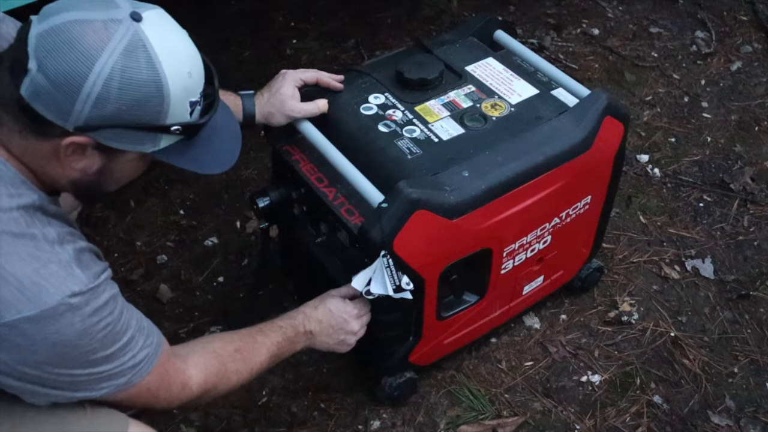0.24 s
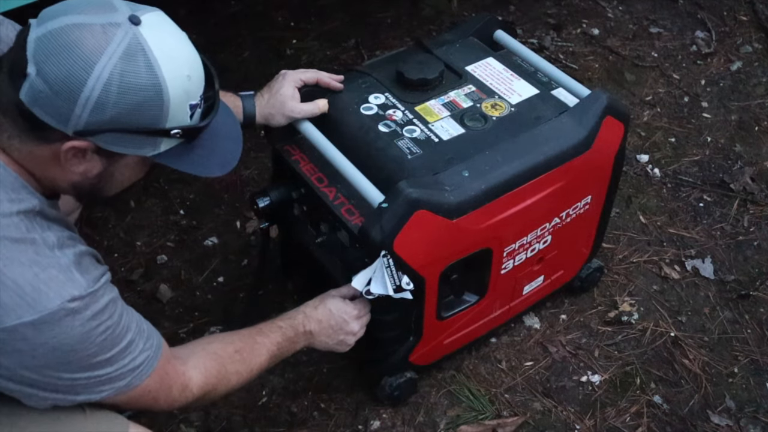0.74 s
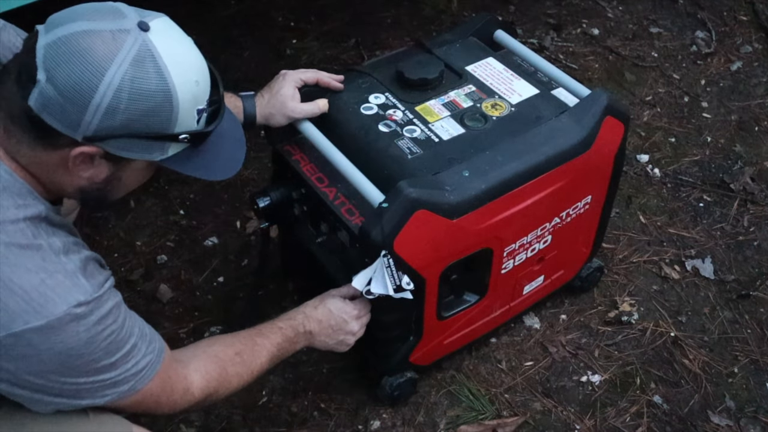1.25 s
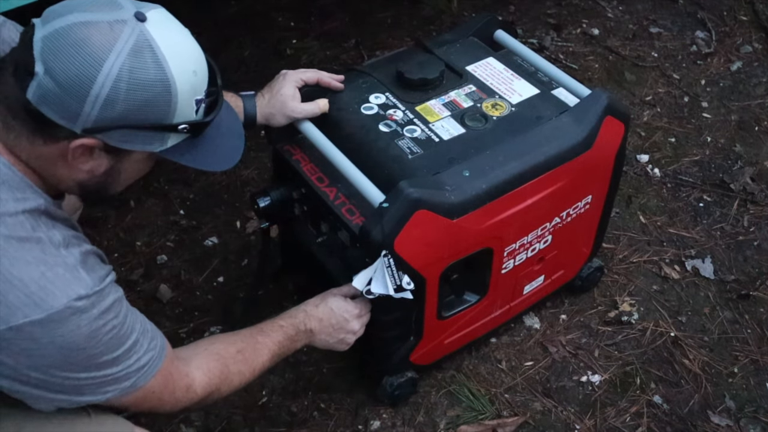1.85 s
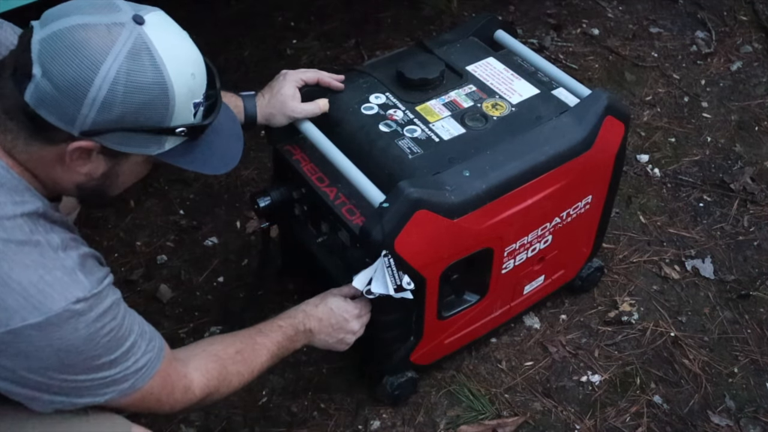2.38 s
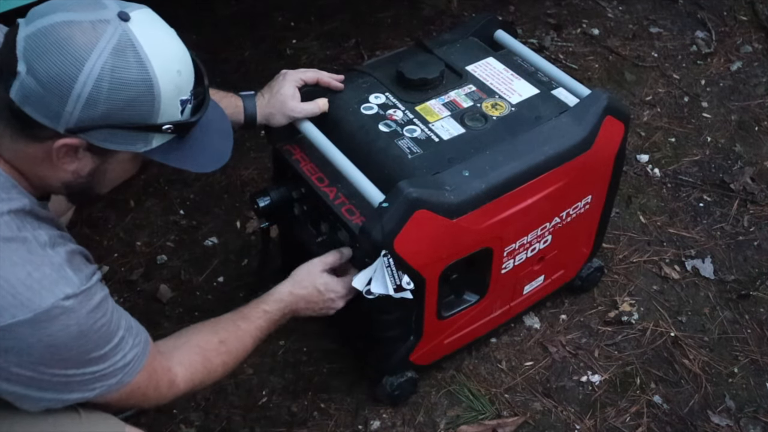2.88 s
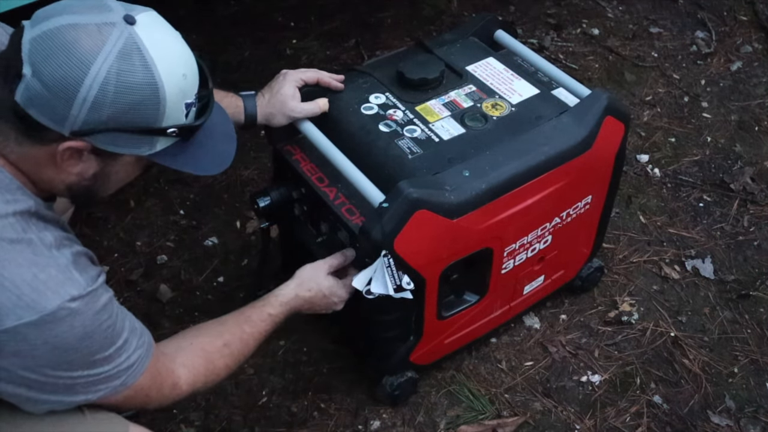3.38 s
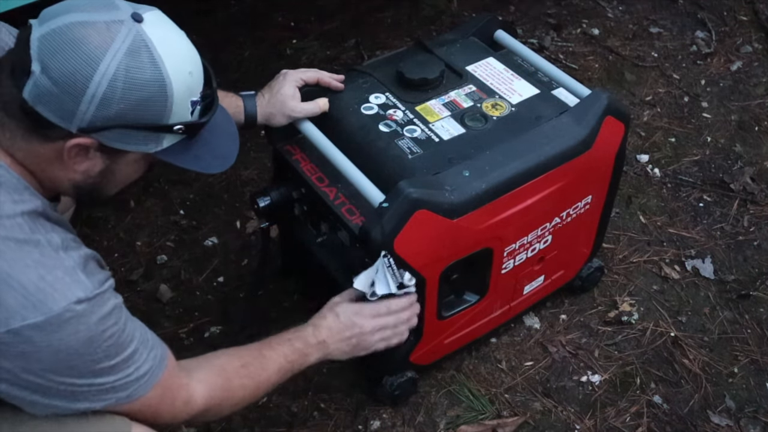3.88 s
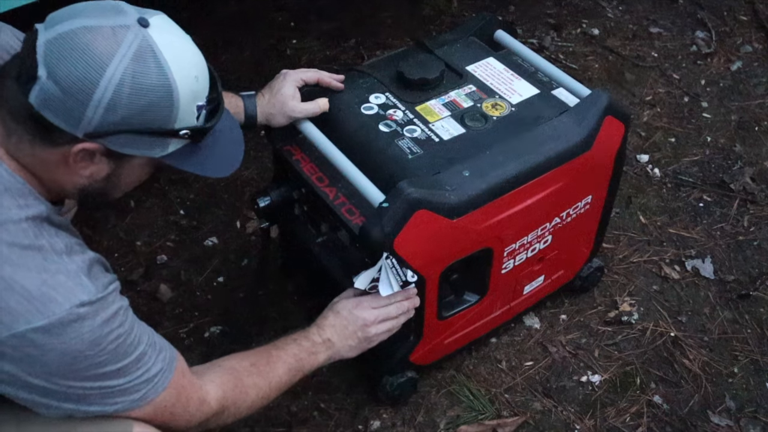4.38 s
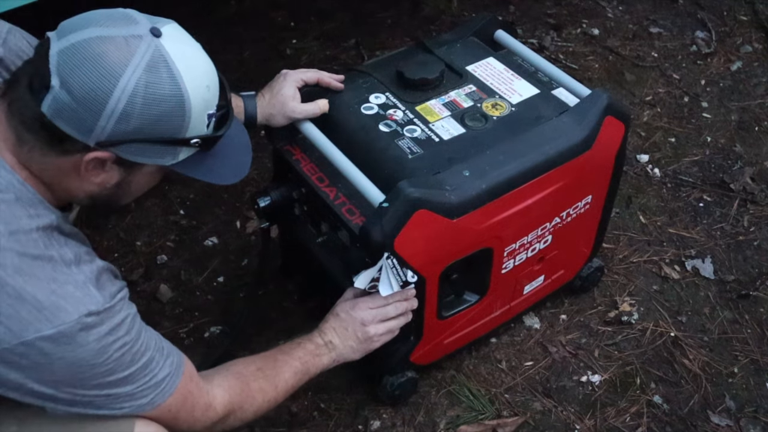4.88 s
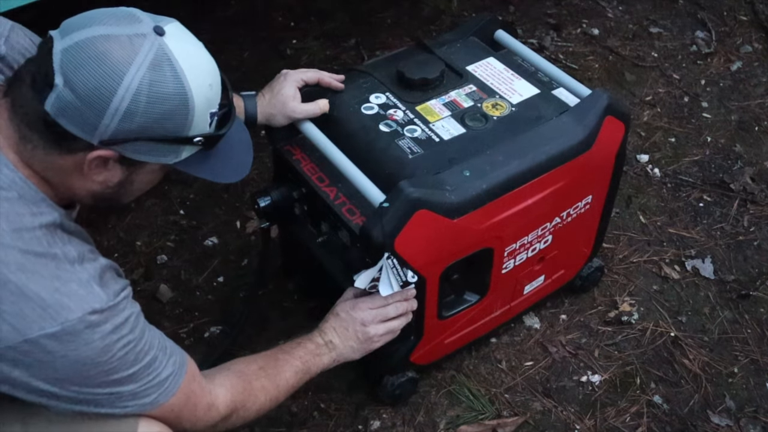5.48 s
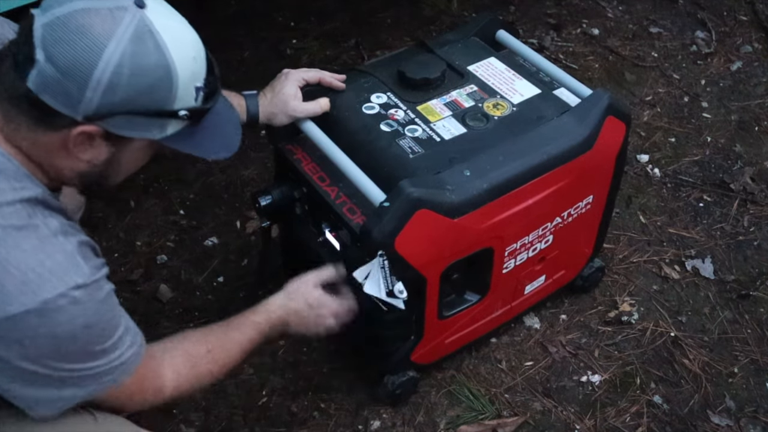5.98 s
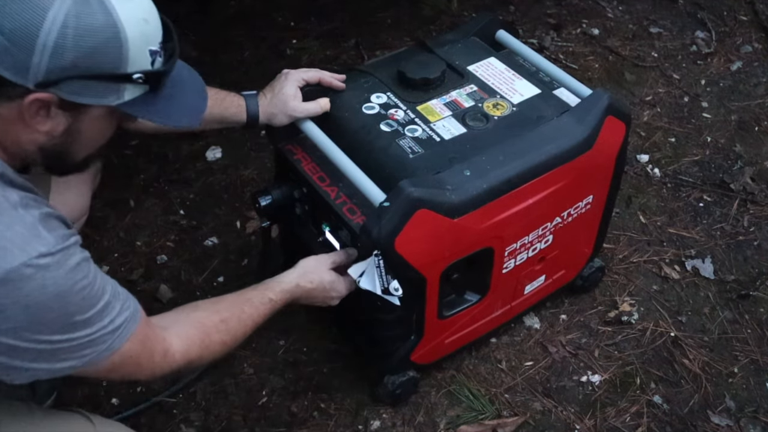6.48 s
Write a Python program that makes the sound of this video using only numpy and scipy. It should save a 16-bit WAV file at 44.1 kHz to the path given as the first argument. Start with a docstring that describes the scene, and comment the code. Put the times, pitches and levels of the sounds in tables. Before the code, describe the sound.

A small petrol generator's electric starter cranks without firing, coasts to a stop, clicks, then cranks again, catches with hard knocks and revs up.

```python
"""Forest floor, a portable petrol generator; one microphone channel, no distance or reflections modelled.
First the electric starter cranks the single-cylinder four-stroke in still air while the carburettor's servo hums.
The key is let go and all coasts to rest; a control is clicked over as the hum weakens.
On the second try the starter clanks in, the engine catches, knocks hard for a few cycles and runs up.
Crank angle times gear tones, gas puffs and contacts; noise bursts and ringing sines make the blows and knocks."""
import sys
import numpy as np
from scipy import signal
from scipy.fft import rfft, irfft, next_fast_len
from scipy.io import wavfile

SR = 44100
rng = np.random.default_rng(int(sys.argv[2]) if len(sys.argv) > 2 else 0)


def wav_out(sig):
    """Save sig, one row per channel (or a flat mono array), as 16-bit PCM at SR to the path in sys.argv[1]."""
    wavfile.write(sys.argv[1], SR, np.round(np.clip(np.atleast_2d(sig).T, -1, 1) * 32767).astype(np.int16))


N = 297234
TIME = np.arange(N) / SR

# still forest air, spectrum: [f/Hz, relative level/dB]
AIR_SPECTRUM = [(15, -51), (25, -16.5), (76, -5), (111, 0), (145, 0.5), (200, 7), (242, -6.5), (427, -11.5),
                (503, -8.5), (677, -9.5), (863, -8), (2160, -26.5), (2840, -16), (3340, -26),
                (16000, -31.5)]
# servo hum over time: [t/s, level/dB]
HUM_LEVEL = [(0, -24.5), (3.2, -33.5), (3.8, -35.5), (4.1, -45), (4.6, -42.5), (6.74, -55)]
# lines of the servo hum: [f/Hz, relative level/dB]
HUM_LINES = [(105, -9.5), (210.5, -4.5), (272, -28), (552, -23.5), (829, -20.5)]
# starter gears, spectrum: [f/Hz, relative level/dB]
GEAR_SPECTRUM = [(40, -2.5), (100, 3.5), (200, -4), (300, -8), (450, -5.5), (570, -15), (800, -9),
                 (1300, -15), (1700, -10.5), (2300, -20.5), (3000, -16.5), (4000, -21), (6000, -28.5),
                 (10000, -35), (15000, -46.5)]
# resonances of the starter's housing and the panels: [f/Hz, width/Hz, boost/dB]
HOUSING_RESONANCES = [(651, 62, 13), (893.7, 23, 4), (1104.4, 53, 13), (1864, 150, 6), (2240, 25, 10.5),
                      (2615, 25, 9), (2935, 170, 9), (3442, 147, 11.5), (4004, 210, 7.5), (4620, 54, 7),
                      (5230, 380, 8.5), (6250, 170, 5.5), (7420, 63, 11), (8250, 79, 10), (10340, 110, 5),
                      (12150, 260, 8.5), (13800, 450, 7)]
# clanks of the solenoid and pinion, the gears' backlash while coasting, and bangs of the first firings: [t/s,
# level/dB, 60 dB decay/s, thud/dB]
CLANKS = [(2.645, -9, 0.099, -17), (2.673, -25, 0.08, -37), (3.218, -33, .13, -30), (3.268, -36.5, .2, -45),
          (4.627, -7.5, 0.083, -31), (4.636, -2.5, 0.091, -22), (5.572, -12.5, 0.034, -32),
          (5.671, -9, .038, -25)]
# struck metal, spectrum: [f/Hz, relative level/dB]
CLANK_SPECTRUM = [(60, -15), (300, 1), (700, 1), (1100, -1.5), (2000, -6.5), (3200, -7), (4200, -15),
                  (8000, -28), (15000, -33)]
# what rings after a hard blow: [f/Hz, width/Hz, boost/dB]
CRANKCASE_RESONANCES = [(305, 50, 5), (455, 50, 4), (710, 120, 6), (1090, 70, 6), (1700, 160, 5),
                        (2700, 250, 3), (3450, 200, 6)]
# light clicks of loose parts and fingers on the control panel, and the engine rocking back as it comes to rest:
# [t/s, level/dB, 60 dB decay/s, thud/dB]
CLICKS = [(3.217, -38, 0.058, -52), (3.39, -49, .14, -28.5), (3.895, -48, 0.39, -65),
          (3.963, -24.5, 0.063, -50), (3.986, -34.5, .075, -31), (4.07, -49, .08, -65),
          (4.597, -45, 0.38, -65)]
# light panel contacts, spectrum: [f/Hz, relative level/dB]
PANEL_SPECTRUM = [(150, -1), (300, -17), (850, 0), (1500, -8.5), (3600, 5.5), (5500, -2.5), (8000, -18.5),
                  (13000, -20), (16000, -33)]
# running clatter, spectrum: [f/Hz, relative level/dB]
CLATTER_SPECTRUM = [(35, -44), (60, 6), (200, 1.5), (400, 2), (650, -4), (900, -2.5), (1350, -7),
                    (2200, -11.5), (3200, -16), (5000, -26.5), (7500, -38), (15000, -43)]
# first ragged firings: [t/s, bang level/dB, 60 dB decay/s, thud/dB, knock/dB]
FIRINGS = [(5.449, -12.5, 0.053, -7.5, -40), (5.557, -15, 0.073, -14.5, -40),
           (5.649, -13, 0.077, -23, -7.5), (5.736, -11.5, 0.21, -8.5, -5.5), (5.807, -8.5, 0.12, -13, -17),
           (5.8664, -17, 0.15, -30, -8)]
# ringing of the knock in the cylinder: [f/Hz, relative level/dB, 60 dB decay/s]
KNOCK_MODES = [(2622, 5.5, 0.024), (2516, 2.5, .012), (2770, -15, 0.025), (3160, -0.5, 0.017),
               (5200, -19, 0.02)]
# run-up on the engine's own power: [t/s, speed/(four-stroke cycles per s)]
RUN_UP = [(5.48, 7.85), (5.62, 10.45), (5.78, 13.77), (5.88, 18.65), (6, 21.76), (6.15, 24.82),
          (6.3, 27.06), (6.5, 27.57), (6.74, 25.94)]

AIR_DB = -46.5
RING_GEAR_ORDER, ARMATURE_ORDER = 108, 210  # vibrations per four-stroke cycle
# first try: key let go, crank at rest; second try: starter engages (s)
RELEASE_S, STOP_S, ENGAGE_S = 2.63, 3.446, 4.63
# cranking nears a top speed (cycles per s) with a time constant (s)
FIRST_SPEED, FIRST_TOP_SPEED, FIRST_RISE_S = 7.05, 8.272, .55
SECOND_TOP_SPEED, SECOND_RISE_S = 8.027, .2256
# let go, it slows by drag (time constant) until compression brakes it (cycles per s, per s)
DRAG_S, BRAKE_PER_S = .72, 20
# starter levels at top speed, their change under full strain, and the shortfall (cycles per s) that gives it
RATTLE_DB, GEAR_DB, WHINE_DB = -18.5, -10, -17
RATTLE_STRAIN_DB, GEAR_STRAIN_DB, WHINE_STRAIN_DB = 1, -12, 4.5
OVERTONE_STRAIN_DB = 2
FULL_STRAIN_SHORTFALL = .6
# drive builds up on the second try; on the first, rattle and whine are cut just before the pinion lets go
DRIVE_ATTACK_S, CUT_LEAD_S, CUT_DB_PER_S = 0.15, 0.019, 600
# it fades once the engine overruns the starter
OVERRUN_S, OVERRUN_RATTLE_DB_PER_S, OVERRUN_TONE_DB_PER_S = 5.483, 35, 119
# gas: level at the first top speed, gain per doubling below and above it, change when coasting
GAS_DB, GAS_SLOW_DB, GAS_FAST_DB, GAS_COAST_DB = -11, 7, 1.5, -6
# combustion brings the running clatter, louder with each doubling of speed
CATCH_S, CATCH_RISE_S, CLATTER_DB, CLATTER_DOUBLING_DB = 5.35, 0.072, -23, 1.66
# near full speed, where the governor eases the throttle, the gas softens at a set rate
EASE_S, EASE_DB_PER_S = 6.22, 14
# coasting sounds: level at the release and rate of fall
COAST_TONE_DB, COAST_TONE_DB_PER_S = -12.5, 33
COAST_RATTLE_DB, COAST_RATTLE_DB_PER_S = -35, 18
SCRAPE_DB, SCRAPE_DB_PER_S = -45.5, 17
ROCKING_DB, ROCKING_DB_PER_S = -26.5, 13
# after the firings: one knock a cycle, later in the cycle (share of it) up to a limit, softer after a hold
KNOCK_FROM_S, KNOCK_ANGLE, KNOCK_ANGLE_PER_S, KNOCK_LAST_ANGLE = 5.9, .55, .31, .72
KNOCK_DB, KNOCK_HOLD_S, KNOCK_DB_PER_S = -11, 0.17, 28.5
STOPBAND_HZ = 16700  # 70 dB down from here up


def from_db(db):
    """Level in dB to amplitude."""
    return 10 ** (np.asarray(db) / 20)


def rms_one(x):
    """Scale to rms 1."""
    return x / np.sqrt(np.mean(x ** 2) + 1e-20)


def in_time(rows):
    """One curve per column, joined by straight lines."""
    s, *columns = np.transpose(rows)
    return [np.interp(TIME, s, c) for c in columns]


def since(start_s):
    """Seconds gone by since a moment, 0 before it."""
    return np.maximum(TIME - start_s, 0)


def drift(rate):
    """Slow chance of rms 1, with this many random knots per second."""
    knots = rng.standard_normal(int(N / SR * rate) + 2)
    return rms_one(np.interp(TIME * rate, np.arange(len(knots)), knots))


def filtered(x, kind, order, hz):
    """Butterworth filter."""
    return signal.sosfilt(signal.butter(order, hz, kind, fs=SR, output="sos"), x)


def colour(x, spectrum, resonances=()):
    """Causal (minimum-phase) filter: a smooth spectrum with resonant bumps on it."""
    size = 2 * next_fast_len(N // 2 + SR // 4)
    hz = np.maximum(np.arange(size // 2 + 1) * SR / size, 1)
    points_hz, points_db = np.transpose(spectrum)
    db = np.interp(np.log(hz), np.log(points_hz), points_db)
    for centre, width, boost in resonances:
        db = db + boost / (1 + (2 * (hz - centre) / width) ** 2)
    # folding the cepstrum onto positive time gives minimum phase
    cepstrum = irfft(np.log(from_db(db)))
    cepstrum[1:size // 2] *= 2
    cepstrum[size // 2 + 1:] = 0
    return irfft(rfft(x, size) * np.exp(rfft(cepstrum)))[:N]


def ring(x, hz, t60):
    """A unit click sets a decaying sine of initial height 1 ringing."""
    radius = from_db(-60 / (t60 * SR))
    step = 2 * np.pi * hz / SR
    return signal.lfilter([0, np.sin(step)], [1, -2 * radius * np.cos(step), radius * radius], x + 1e-18)


def taps_at(times, db):
    """Single-sample taps."""
    out = np.zeros(N)
    index = np.clip((np.asarray(times) * SR).astype(int), 0, N - 1)
    np.add.at(out, index, from_db(db))
    return out


def puff(taps, low_hz, high_hz):
    """Each tap becomes a push-pull-push swing of air as high as the tap."""
    swing = filtered(signal.unit_impulse(SR // 10), "band", 2, [low_hz, high_hz])
    return signal.fftconvolve(taps, swing / np.abs(swing).max())[:N]


def grit(per_s, spread_db):
    """Dense random contacts of uneven strength; rms 1."""
    sizes = from_db(spread_db * np.minimum(rng.exponential(1, N), 4))
    return rms_one(sizes * rng.standard_normal(N) * (rng.random(N) < per_s / SR))


def bursts(rows, spectrum, resonances=()):
    """Each blow starts a chatter of contacts that dies away in the body."""
    envelope = np.zeros(N)
    for s, db, t60, *_ in rows:
        decay = from_db(-60 * np.clip((TIME - s) / t60, 0, 2))
        envelope += from_db(db) * (TIME >= s) * decay
    contacts = rng.standard_normal(N)
    steady = colour(contacts, spectrum, resonances)
    return colour(contacts * envelope, spectrum, resonances) / np.std(steady)


def at_angle(cycle, angle):
    """A tap whenever the engine passes this share of its cycle."""
    passed = np.floor(cycle - angle)
    return np.diff(passed, prepend=passed[0])


def swell(cycle, angle, count=1):
    """A smooth swing between -1 and 1, count times a cycle, highest at this angle."""
    return np.cos(2 * np.pi * count * (cycle - angle))


def crank_speed():
    """Cycles per s: cranking, coasting to rest, cranking again, running up."""
    shortfall = (FIRST_TOP_SPEED - FIRST_SPEED) * np.exp(-np.minimum(TIME, RELEASE_S) / FIRST_RISE_S)
    dragged = (FIRST_TOP_SPEED - shortfall) * np.exp(-since(RELEASE_S) / DRAG_S)
    first = np.minimum(dragged, BRAKE_PER_S * np.maximum(STOP_S - TIME, 0))
    second = SECOND_TOP_SPEED * (1 - np.exp(-since(ENGAGE_S) / SECOND_RISE_S))
    return np.where(TIME < RUN_UP[0][0], first + second, in_time(RUN_UP)[0])


def background():
    """Still forest air as coloured noise, and the servo's hum as wavering sine lines."""
    hum_db, = in_time(HUM_LEVEL)
    hum = np.zeros(N)
    for hz, db in HUM_LINES:
        hum += from_db(db + 2 * drift(21.05)) * np.sin(2 * np.pi * hz * TIME + .5 * drift(3.24))
    air = rms_one(colour(rng.standard_normal(N), AIR_SPECTRUM))
    return from_db(hum_db) * hum + from_db(AIR_DB) * air


def drive(cut_s, overrun_db_per_s):
    """Gain of a starter sound: on until the cut, then rising on the second try and fading on overrun."""
    first = from_db(-CUT_DB_PER_S * since(cut_s))
    attack = np.minimum(since(ENGAGE_S) / DRIVE_ATTACK_S, 1)
    return first + attack * from_db(-overrun_db_per_s * since(OVERRUN_S))


def starter(cycle, speed):
    """Teeth mesh and rattle; their tones sweep through the housing's resonances as the piston loads them."""
    strain = np.clip((FIRST_TOP_SPEED - speed) / FULL_STRAIN_SHORTFALL, 0, 1)
    labour = np.clip(1 - speed / 5.93, 0, 1)  # 1 at standstill, 0 from 5.93 cycles per s up
    cut_s = RELEASE_S - CUT_LEAD_S
    rattle_gain = from_db(RATTLE_DB + RATTLE_STRAIN_DB * strain) * drive(cut_s, OVERRUN_RATTLE_DB_PER_S)
    whine_gain = from_db(WHINE_DB + WHINE_STRAIN_DB * strain) * drive(cut_s, OVERRUN_TONE_DB_PER_S)
    gear_gain = from_db(GEAR_DB + GEAR_STRAIN_DB * strain) * drive(RELEASE_S, OVERRUN_TONE_DB_PER_S)
    # compression loads the gears once a cycle
    load = swell(cycle, .2)
    # a sharp tick comes once a turn
    snap = np.maximum(swell(cycle, .1, count=2), 0) ** 20
    # the piston's inertia tugs twice a turn
    tug = swell(cycle, .185, count=4)
    angle = cycle + .0016 * swell(cycle, .55) + .00012 * drift(60) + .0004 * labour * drift(150)
    mesh = np.sin(2 * np.pi * RING_GEAR_ORDER * angle)
    gear = mesh * gear_gain * from_db(4.5 * load + 1.2 * drift(90))
    rotor = 2 * np.pi * ARMATURE_ORDER * angle + .3 * drift(300)
    whine = np.sin(rotor) * from_db(3.6 * snap + 3.3 * drift(200))
    overtone = np.sin(2 * rotor) * from_db(5.5 * tug + 2 * drift(200))
    # harsher when strained, softer when slow
    overtone = overtone * from_db(OVERTONE_STRAIN_DB * (strain - 2 * labour))
    armature = (whine + from_db(-0.5) * overtone) * whine_gain
    tones = colour(gear + armature, GEAR_SPECTRUM, HOUSING_RESONANCES)
    teeth = grit(per_s=8000, spread_db=0.0) * from_db(0.2 * load + tug + 0.27 * mesh + 4.7 * snap)
    # slow teeth meet softly and sound duller
    dull = filtered(teeth, "low", 2, 3000)
    soft = np.minimum(2.17 * labour, 1)
    teeth = soft * dull + (1 - soft) * teeth
    # small gears radiate little bass
    teeth = filtered(teeth, "high", 1, 260)
    return tones + rattle_gain * rms_one(colour(teeth, GEAR_SPECTRUM, HOUSING_RESONANCES))


def engine(cycle, speed):
    """Each cycle brings an exhaust puff, an intake gulp and the same round of valve and piston contacts."""
    fired = np.minimum(since(CATCH_S) / CATCH_RISE_S, 1)
    coasting = (TIME > RELEASE_S) * (TIME < ENGAGE_S)
    doublings = np.log2(np.maximum(speed / FIRST_TOP_SPEED, 1e-3))
    pumping_db = doublings * np.where(doublings < 0, GAS_SLOW_DB, GAS_FAST_DB)
    gas_db = GAS_DB + pumping_db + GAS_COAST_DB * coasting - EASE_DB_PER_S * since(EASE_S)
    # a firing engine breathes less evenly than a cranked one
    flow = from_db(gas_db + np.interp(speed, [8, 20], [.5, 1.5]) * drift(60))
    # the air column trails the piston more at speed
    lag = np.interp(speed, [8, 12, 22], [.265, .33, .36])
    exhaust = at_angle(cycle, 0) * flow
    intake = at_angle(cycle, lag) * flow
    # every listed blow rocks the engine on its mounts
    thud_rows = [(s, thud_db) for s, _, _, thud_db, *_ in FIRINGS + CLANKS + CLICKS]
    thuds = taps_at(*np.transpose(thud_rows))
    gas = puff(exhaust, low_hz=105, high_hz=250) + puff(intake + thuds, low_hz=100, high_hz=205)
    # the air in the enclosure booms briefly after each
    boom = .27 * ring(exhaust + intake + thuds, hz=180, t60=.08)
    boom = boom + .12 * ring(intake + thuds, hz=130, t60=.09)
    # hot exhaust rings the silencer
    boom = boom + fired * from_db(-11.5) * ring(exhaust, hz=276, t60=0.099)
    angles, signs = rng.random(60), rng.choice([-1, 1], 60)
    contacts = sum(at_angle(cycle, angle) * sign for angle, sign in zip(angles, signs))
    running = TIME > 6  # levels are set over this stretch
    contacts = contacts * from_db(2.0 * drift(200)) / np.std(contacts[running])
    fan = from_db(1.5) * grit(per_s=6000, spread_db=2.5) * from_db(2 * swell(cycle, 0.67))
    clatter = colour(contacts + fan, CLATTER_SPECTRUM)
    shake = from_db(-12) * swell(cycle, 0.5, count=2)  # the crank's unbalance, once a turn
    clatter_gain = fired * from_db(CLATTER_DB + CLATTER_DOUBLING_DB * doublings)
    return gas + boom + clatter_gain * (clatter / np.std(clatter[running]) + shake)


def spin_down(cycle, speed):
    """The freed gear sinks in pitch, catching unevenly, and rattles; once a turn the engine scrapes and rocks."""
    gone = since(RELEASE_S)
    moving = (TIME > RELEASE_S) * (TIME < STOP_S) * np.minimum(speed / 3.2, 1)
    turning = 2 * np.pi * np.cumsum(RING_GEAR_ORDER * speed * (1 + .03 * drift(140))) / SR
    tone_db = COAST_TONE_DB - COAST_TONE_DB_PER_S * gone + 2.4 * drift(21.85) + 3.7 * drift(200)
    tone = np.sin(turning) * from_db(tone_db)
    # the loose rattle peaks once a cycle
    rattle = rms_one(colour(grit(per_s=1400, spread_db=0.5) * from_db(2.4 * drift(45)), CLANK_SPECTRUM))
    rattle_peak_db = 8.7 * np.maximum(swell(cycle, 0.5), 0) ** 4
    rattle = rattle * from_db(COAST_RATTLE_DB - COAST_RATTLE_DB_PER_S * gone + rattle_peak_db)
    scrape = rms_one(filtered(grit(per_s=10000, spread_db=-2.0), "high", 1, 4000))
    scrape = scrape * from_db(SCRAPE_DB - SCRAPE_DB_PER_S * gone + 16 * (swell(cycle, 0.48, count=2) - 1))
    rocking = rms_one(puff(rng.standard_normal(N), low_hz=55.7, high_hz=175))
    rocking = rocking * from_db(ROCKING_DB - ROCKING_DB_PER_S * gone + 4 * (swell(cycle, 0.45, count=2) - 1))
    return colour(tone * moving, GEAR_SPECTRUM) + (rattle + scrape + rocking) * moving


def hard_blows():
    """Solenoid, pinion, gear backlash and first firings strike the crankcase, which rings."""
    return bursts(CLANKS + FIRINGS, CLANK_SPECTRUM, CRANKCASE_RESONANCES)


def light_clicks():
    """Loose parts and fingers on the control panel make small dry chatters; the engine rocks back once as it
    comes to rest."""
    return bursts(CLICKS, PANEL_SPECTRUM)


def knocks(cycle, scatter_db, rise_t60, crack_db, crack_t60):
    """Early, hard combustion rings the cylinder and jars the housing."""
    angle = np.minimum(KNOCK_ANGLE + KNOCK_ANGLE_PER_S * since(KNOCK_FROM_S), KNOCK_LAST_ANGLE)
    fall_db = KNOCK_DB_PER_S * since(KNOCK_FROM_S + KNOCK_HOLD_S)
    strength_db = KNOCK_DB - fall_db + scatter_db * drift(25)
    due = (at_angle(cycle, angle) > 0) & (TIME > KNOCK_FROM_S)
    rows = [(s, knock_db) for s, *_, knock_db in FIRINGS] + list(zip(TIME[due], strength_db[due]))
    taps = taps_at(*np.transpose(rows))
    pings = np.zeros(N)
    for hz, level, t60 in KNOCK_MODES:
        # taking away a shorter ring softens the onset
        pings += ring(taps * from_db(level + 2.1 * drift(24.74)), hz, t60)
        pings -= ring(taps * from_db(level), hz, rise_t60)
    cracks = [(s, level + crack_db, crack_t60) for s, level in rows]
    return pings + bursts(cracks, PANEL_SPECTRUM)


def scene():
    """The crank's angle times starter and engine alike."""
    speed = crank_speed()
    cycle = np.cumsum(speed) / SR
    machine = starter(cycle, speed) + engine(cycle, speed) + spin_down(cycle, speed)
    blows = hard_blows() + light_clicks()
    knocking = knocks(cycle, scatter_db=1.8, rise_t60=0.0025, crack_db=-14.5, crack_t60=0.11)
    return (background() + machine + blows + knocking)[None]


def record(dry):
    """At the microphone channel the highest peaks are rounded off and the top is cut."""
    rounded = dry / (1 + dry ** 6) ** (1 / 6)
    return signal.sosfilt(signal.cheby2(14, 70, STOPBAND_HZ, fs=SR, output="sos"), rounded)


dry = scene()
out = record(dry)
wav_out(out)
```